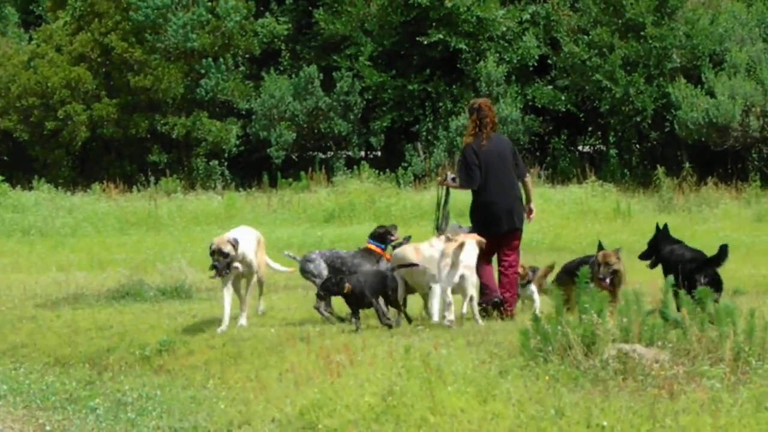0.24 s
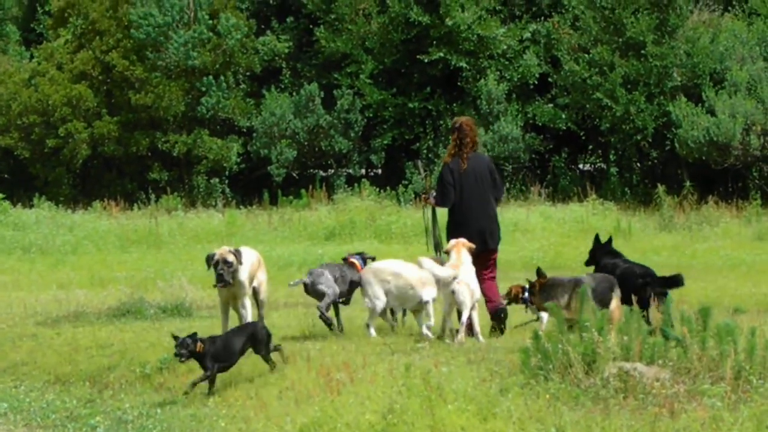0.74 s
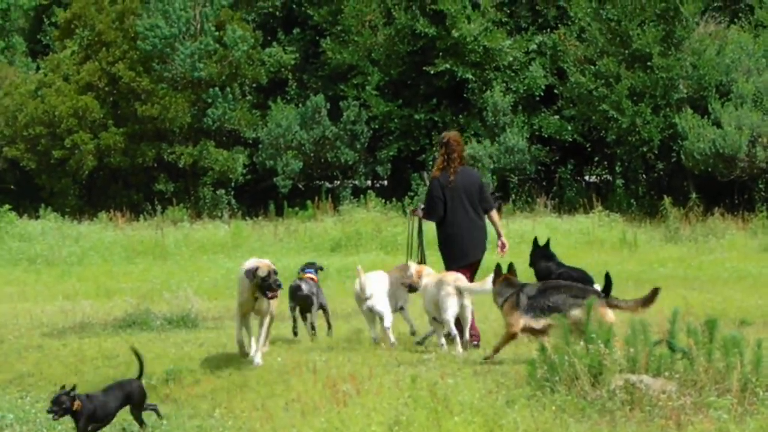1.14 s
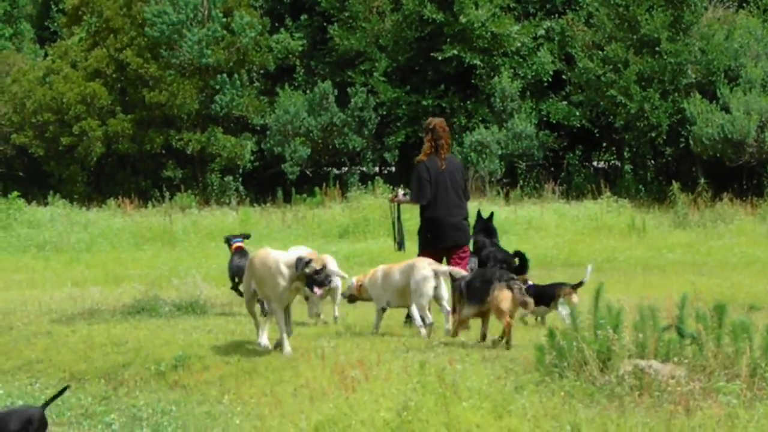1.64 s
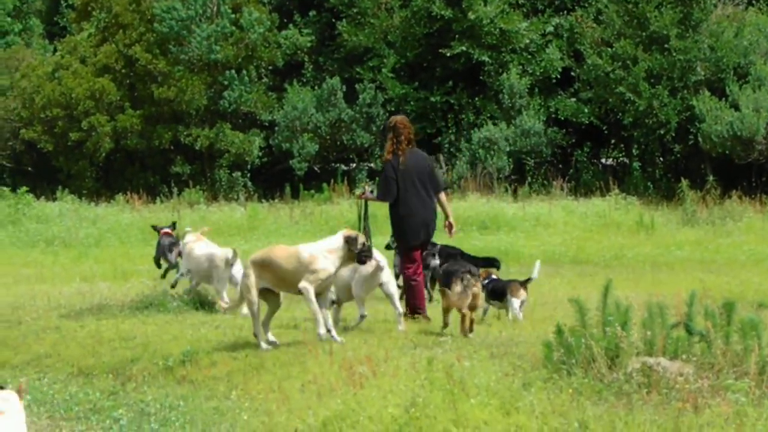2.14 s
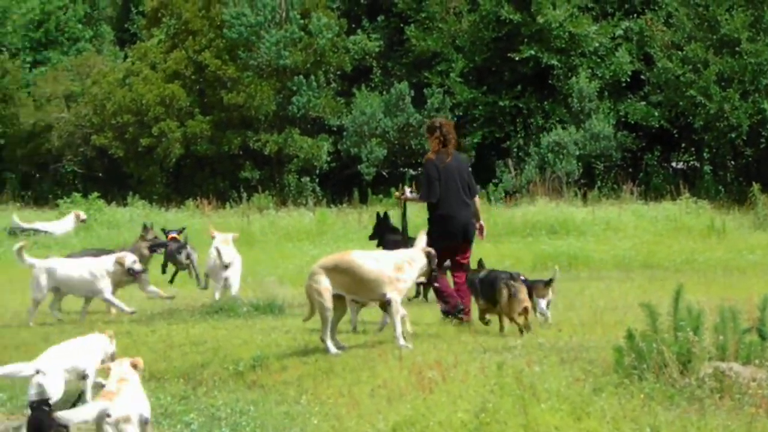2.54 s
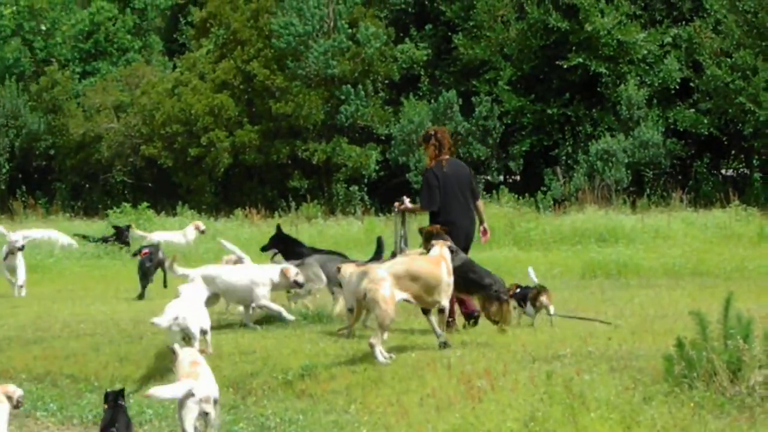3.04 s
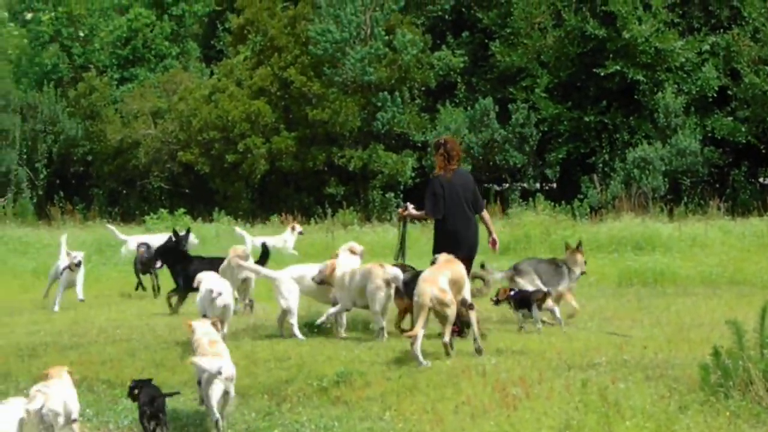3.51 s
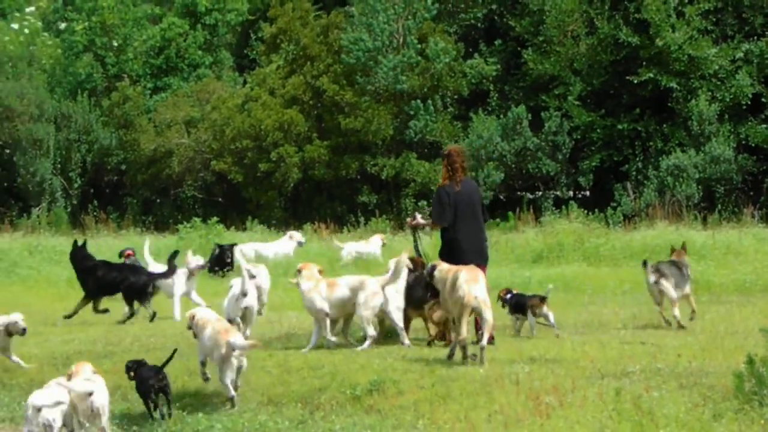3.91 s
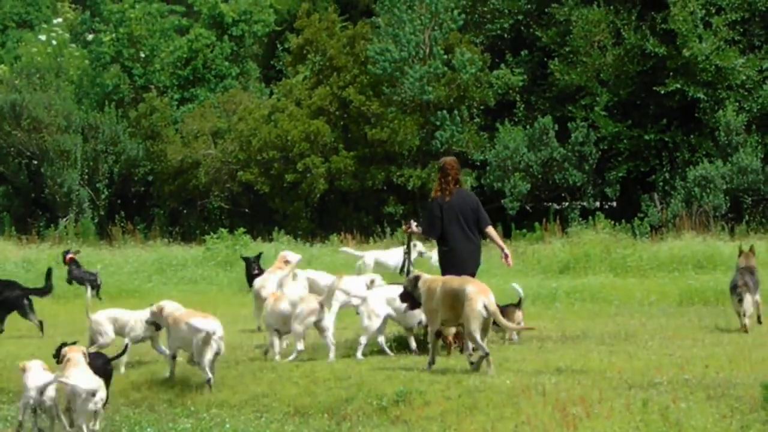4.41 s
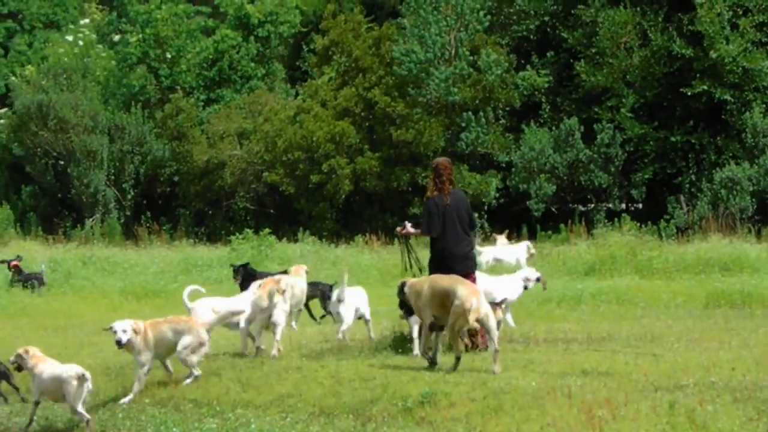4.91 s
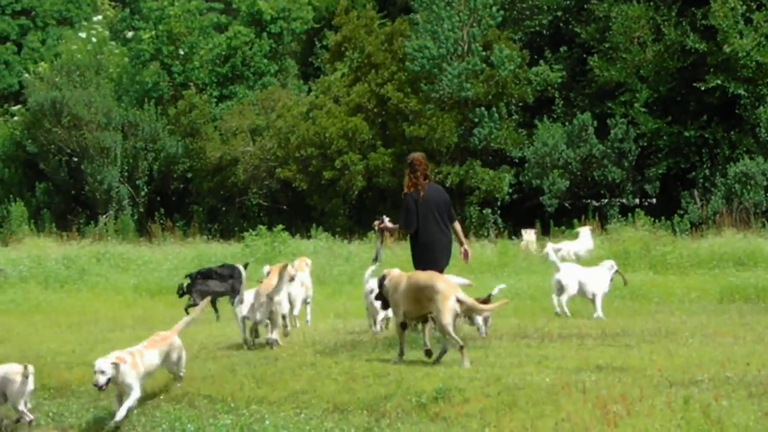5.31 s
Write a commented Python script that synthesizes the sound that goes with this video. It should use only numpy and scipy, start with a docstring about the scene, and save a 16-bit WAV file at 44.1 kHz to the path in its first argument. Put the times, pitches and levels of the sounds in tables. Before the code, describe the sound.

A close, crisp swishing of long grass with brittle snaps and muffled paw patter, fading after four seconds to near silence and tiny insect chirps.

```python
"""Open field, long grass: a pack of dogs trots past and moves off. Patchy noise under contact envelopes makes
blades, stems and turf; tiny decaying grains make the crackle. Snapping stalks, paw falls and knocked stems are
short rings plus coloured noise bursts. Late on, insects chirp and soft pants or swishes sound as narrow noise;
the field adds hiss and a faint low rumble. The mono microphone path has a narrow notch and a band limit."""
import sys
import numpy as np
from scipy import signal
from scipy.io import wavfile
from scipy.ndimage import uniform_filter1d

SR = 44100
rng = np.random.default_rng(int(sys.argv[2]) if len(sys.argv) > 2 else 0)


def store_wav(level_fs):
    """Save 16-bit WAV to argv[1]."""
    pcm = np.round(np.clip(np.atleast_2d(level_fs), -1, 1) * 32767)
    wavfile.write(sys.argv[1], SR, pcm.T.astype(np.int16))


N = 244972  # samples

# pack passing and leaving: (time [s], rustle level [dB], paw patter level [dB])
PACK_LEVELS = [(0.0, -39, -47), (0.34, -38.5, -47), (0.6, -39.5, -46), (0.93, -38, -47),
               (1.1, -40.5, -42.5), (1.22, -42.5, -44.5), (1.36, -38, -49), (1.51, -40.5, -48.5),
               (1.87, -42.5, -46.5), (2.05, -38.5, -48.5), (2.63, -40.5, -49), (2.84, -41.5, -51),
               (3.17, -39, -47), (3.63, -41.5, -52), (3.8, -43, -49), (4.03, -44.5, -55.5), (4.2, -45, -62),
               (4.44, -50.5, -63.5), (5.15, -57, -63), (5.55, -57.5, -66)]
# move to the far stem colour: (time [s], far share [0-1])
FAR_SHARE = [(2.6, 0.53), (3.8, 1)]
# legs sweeping through a tuft: (start [s], blade level [dB], stem level [dB], length [s])
TUFT_SWEEPS = [(0.171, -37.5, -51, 0.027), (0.419, -41, -44.5, 0.043), (0.5, -39.5, -54, 0.016),
               (0.746, -36, -49, .025), (0.765, -33, -42, 0.013), (0.945, -37.5, -42.5, 0.028),
               (1.074, -48, -52, 0.016), (1.3, -33.5, -47, 0.0088), (1.584, -41.5, -42.5, 0.038),
               (1.83, -40.5, -40.5, 0.042), (2.128, -38, -51, 0.011), (2.251, -35, -41, 0.0054),
               (2.312, -36.5, -51, 0.011), (2.67, -34.5, -56, 0.011), (2.855, -37, -45.5, 0.055),
               (3.15, -37, -61, 0.014), (3.25, -40.5, -48.5, 0.077), (3.375, -35.5, -41.5, 0.016),
               (3.549, -39.5, -44, 0.028), (3.668, -41, -45, 0.032), (3.71, -41.5, -45, 0.048),
               (3.932, -53, -47.5, 0.054), (4.104, -42.5, -56, 0.027), (4.308, -50.5, -55, 0.084),
               (4.678, -53, -56, .04), (4.791, -52, -58, 0.087), (5.313, -51, -58.5, 0.081)]
# dry stalks snapping: (time [s], level before blow_db [dB], pitch [Hz], crack re snap [dB])
STALK_SNAPS = [(0.0313, -25, 7110, -24), (0.167, -22, 6970, -25), (0.182, -22, 6050, -23),
               (0.253, -18, 9090, -22), (0.3326, -25, 6200, -22), (0.7015, -13.5, 5850, -26),
               (0.747, -20, 5900, -18), (0.759, -15.5, 9900, -18), (0.772, -14.5, 9050, -16),
               (0.951, -22, 8900, -24), (0.963, -26, 6700, -18), (1.114, -24, 8750, -19),
               (1.307, -18.5, 6530, -24), (1.479, -26, 5900, -24), (1.8607, -24, 6020, -24),
               (2.005, -21, 6000, -17), (2.1321, -21, 5900, -15), (2.1499, -14, 6100, -29),
               (2.1664, -23, 7200, -19), (2.2534, -13.5, 5840, -29), (2.3672, -21.5, 8870, -22),
               (2.393, -21, 4200, -27), (2.5637, -22, 9200, -21), (2.6765, -25, 8910, -18),
               (2.8074, -28, 6300, -12), (2.861, -17, 5890, -20), (2.954, -21, 5780, -19),
               (3.063, -17, 9050, -15), (3.0904, -22.5, 6700, -11), (3.155, -24, 6650, -15),
               (3.313, -32, 7260, -12), (3.347, -21, 9500, -17), (3.38, -16, 8700, -23),
               (3.497, -19, 6800, -18), (3.6693, -21, 8980, -15), (3.678, -23, 6700, -16),
               (3.777, -22.5, 4600, -33), (3.958, -28, 3640, -24), (4.061, -27, 7150, -21),
               (4.1076, -27, 9000, -19), (4.2407, -20.5, 7440, -24), (4.4627, -34, 3900, -26),
               (4.4724, -39, 3700, -26), (4.5218, -32, 3670, -30), (4.584, -36, 3600, -26),
               (4.6048, -28, 7000, -22), (4.6309, -30.5, 5240, -19), (4.66, -31, 5600, -21),
               (4.891, -30, 9300, -15), (5.034, -42, 6300, -22), (5.4014, -48, 5600, -22),
               (5.4514, -37, 5200, -20), (5.4714, -41, 4200, -22)]
# heavier paw falls: (time [s], level before blow_db [dB], pitch [Hz])
PAW_FALLS = [(0.1, -29, 608), (0.162, -34, 755), (0.19, -35, 670), (0.379, -27.5, 735), (0.436, -31, 720),
             (0.51, -30.5, 634), (0.549, -27.5, 674), (0.72, -32.5, 546), (0.759, -30, 630),
             (0.894, -38, 630), (0.963, -28.5, 845), (1.075, -33.5, 643), (1.087, -29, 825),
             (1.13, -37, 724), (1.191, -33, 567), (1.236, -32, 630), (1.264, -34, 610), (1.318, -29, 706),
             (1.362, -27.5, 760), (1.552, -27.5, 630), (1.566, -27, 698), (1.706, -33, 576),
             (1.903, -30, 810), (1.919, -28, 650), (2.106, -27.5, 596), (2.2, -35.5, 596),
             (2.322, -33, 600), (2.36, -34, 680), (2.395, -30, 766), (2.551, -31, 670), (2.863, -36.5, 566),
             (2.94, -33.5, 760), (2.988, -27, 533), (3.008, -25, 687), (3.072, -34, 794), (3.291, -39, 580),
             (3.563, -31.5, 813), (3.601, -32.5, 790), (3.836, -28, 596), (3.775, -42, 750),
             (3.909, -38.5, 790)]
# legs knocking thick stems: (time [s], level before blow_db [dB], pitch [Hz])
STEM_KNOCKS = [(0.397, -24, 2200), (0.5124, -29.5, 1290), (0.6907, -33, 1850), (0.776, -26, 1290),
               (1.02, -28.5, 1840), (1.274, -28.5, 1250), (1.3398, -29.5, 1800), (1.494, -28.5, 1250),
               (1.6004, -26.5, 1920), (1.9275, -25.5, 1910), (2.251, -21.5, 3060), (2.3195, -23, 2610),
               (2.551, -25, 1730), (2.6367, -26, 2460), (2.8613, -27, 2950), (3.047, -31, 1260),
               (3.283, -28, 3120), (3.3788, -31, 1910), (3.392, -28, 1880), (3.4506, -31, 2280),
               (4.059, -36, 1920), (4.3125, -41, 1210), (4.4006, -39, 2270), (4.604, -40, 1920),
               (4.6972, -38, 2980), (4.815, -38, 2370), (4.895, -38, 3000), (5.29, -46, 1110),
               (5.47, -44, 2070)]
# insect chirps near 9.6 kHz and soft pants or swishes near 7 kHz: (centre time [s], level [dB], pitch [Hz])
CHIRPS_AND_PANTS = [(4.498, -60, 9600), (4.70, -60, 9600), (4.862, -50, 6960), (4.92, -57, 9550),
                    (5.144, -53, 9700), (5.37, -55, 6950), (5.379, -55, 9400), (5.53, -63, 10700)]
# rumble fading: (time [s], gain [dB])
RUMBLE_FADE_DB = [(0, 1), (2.5, 0.5), (4, -2), (5.55, -3)]

# spectrum of thin blades rubbing: (frequency [Hz], relative density [dB per Hz])
BLADE_COLOUR = [(1940, -35), (2500, -22), (2740, -25), (2980, -10.5), (3500, -6.5), (4720, -3), (5140, -4),
                (6050, 0), (7260, 0.5), (7900, -1.5), (9120, -1), (15700, -21.5)]
# spectrum of stems bending: (frequency [Hz], relative density [dB per Hz])
STEM_COLOUR = [(560, -34), (960, -11.5), (1080, 2.5), (1260, 2.5), (1470, -2), (1780, 1), (2100, -3.5),
               (2440, 2), (2740, -5), (3040, 3), (3400, -13.5), (4420, -3), (7480, -120)]
# stems further off, ground echo cutting deeper: (frequency [Hz], relative density [dB per Hz])
FAR_STEM_COLOUR = [(560, -41), (960, -15.5), (1060, -8.5), (1220, -1.5), (1440, -4), (1870, -1),
                   (2040, -3.5), (2450, -4), (2730, -9), (2980, -4.5), (3400, -7.5), (4420, -16.5),
                   (7480, -120)]
# spectrum of turf under paws: (frequency [Hz], relative density [dB per Hz])
SOIL_COLOUR = [(110, -77), (190, -30.5), (303, -12), (453, -10.5), (539, -3), (637, 0), (812, 0),
               (959, -11), (1000, -18), (1300, -32), (2200, -120)]
# brittle top of a near snap: (frequency [Hz], relative density [dB per Hz])
CRACK_COLOUR = [(6000, -49), (9500, -12), (11500, 11), (15800, 10)]
# spectrum of field hiss: (frequency [Hz], relative density [dB per Hz])
AIR_COLOUR = [(120, -43), (200, -15.5), (365, -2), (744, -8), (1050, -0.5), (1310, -3), (1600, -7),
              (4060, -15.5), (6650, -11), (7830, -15), (9400, 3), (11300, -12.5), (15700, -9.5)]
# spectrum of low rumble: (frequency [Hz], relative density [dB per Hz])
RUMBLE_COLOUR = [(12, -53), (20, -13), (32, -2.5), (75, -4), (108, 3), (124, -4.5), (140, -1.5),
                 (200, -24.5), (260, -46), (440, -120)]

AIR_DB, RUMBLE_DB = -53.5, -71.5  # rumble before its fade
RUSTLE, PAWS = 1, 2  # columns of PACK_LEVELS
STEMS_NEAR_DB, STEMS_FAR_DB = -1.5, -5  # re rustle
SNAP_T60_S, CRACK_T60_S, THUD_T60_S, KNOCK_T60_S = 0.022, 0.022, 0.071, 0.028  # noise bursts; rings die sooner
SWEEP_RISE_S, SWEEP_RISE_SHARE = 0.0015, 0.099  # time constant = base + share of length
SWEEP_FADE_S, SWEEP_FADE_SHARE = 0.0053, 0.26
WEIGHT_DB, WEIGHT_LOSS_DB_PER_S, WEIGHT_PITCH_RATIO = -11, 4, 0.561  # low body of a paw fall
CHIRP_WIDTH_S = 0.053  # between 1/e points
NOTCH_HZ, NOTCH_WIDTH_HZ, NOTCH_DEPTH = 7880, 840, 0.98
EDGE_HZ = 15810


def gain_of(db):
    """Amplitude ratio of a level in dB."""
    return 10 ** (np.asarray(db) / 20)


def evened(x):
    """Scale to unit RMS."""
    return x / np.sqrt(np.mean(x ** 2) + 1e-20)


def add(mix, s, sound):
    """Add a sound in place at s seconds, cut at the end of the mix."""
    part = mix[max(round(s * SR), 0):][:len(sound)]
    part += sound[:len(part)]


def colour(x, points):
    """Minimum-phase filter to the given spectrum; white noise keeps its power."""
    f, db = np.transpose(points)
    hz = np.abs(np.fft.fftfreq(8192, 1 / SR))
    gain_db = np.interp(np.log(hz + 1), np.log(f + 1), db)
    log_gain = np.log(gain_of(np.maximum(gain_db, -90)))
    spectrum = np.exp(np.conj(signal.hilbert(log_gain)))
    taps = np.fft.ifft(spectrum).real[:4096]
    return signal.oaconvolve(x, taps / np.linalg.norm(taps))[:N]


def patchy_noise(patchy_db, frames_wide, bins_wide):
    """White noise whose level drifts in random patches of time and frequency."""
    real, imag, patches = rng.standard_normal((N // 64 + 5, 129, 3)).T
    patches = uniform_filter1d(patches, int(bins_wide), 0)
    patches = evened(uniform_filter1d(patches, int(frames_wide), 1))
    spectrum = (real + 1j * imag) * gain_of(patchy_db * patches)
    return evened(signal.istft(spectrum, nperseg=256, noverlap=192)[1][:N])


def brushes(per_s, spread_db, decay_s, rise_s):
    """Unit-RMS envelope of random contacts, each rising quickly and dying away, sizes varied."""
    chance, size = rng.random(N), np.minimum(rng.exponential(1, N), 4)
    t = np.arange(round(0.15 * SR)) / SR
    shape = np.exp(-t / decay_s) * (1 - np.exp(-t / rise_s))
    contacts = (chance < per_s / SR) * gain_of(2 * spread_db * size)  # power
    power = signal.oaconvolve(contacts, shape ** 2)[:N]
    return np.sqrt(np.abs(power) / np.mean(power))


def hits(rows, points, t60, ring, cycles, rise_s, blow_db):
    """Each blow: a ring of a few cycles at its pitch plus a longer noise burst in the struck colour."""
    t = np.arange(round(0.06 * SR)) / SR
    noise = rng.standard_normal((len(rows), len(t)))
    tone, burst = np.zeros(N), np.zeros(N)
    shape = gain_of(-60 * t / t60) * (1 - np.exp(-t / rise_s))
    for (s, db, hz), hiss in zip(rows, noise):
        blow = shape * gain_of(db + blow_db) / shape.max()
        add(tone, s, blow * np.exp(-t * hz / cycles) * np.sin(2 * np.pi * hz * t))
        add(burst, s, blow * hiss)
    return ring * tone + (1 - ring) * colour(burst, points)


def small_hits(column, above_db, spread_db, low_hz, high_hz, count):
    """Lesser blows at random moments, their strength following a level of the pack."""
    when, size, pitch = rng.random((count, 3)).T
    s = when * N / SR
    table = np.transpose(PACK_LEVELS)
    db = np.interp(s, table[0], table[column]) + above_db + spread_db * size
    return np.transpose([s, db, low_hz * (high_hz / low_hz) ** pitch])


def field():
    """Steady patchy hiss of the open field over a faint, fading low rumble."""
    air = evened(colour(patchy_noise(2.8, 30, 3.4), AIR_COLOUR))
    rumble = evened(colour(rng.standard_normal(N), RUMBLE_COLOUR))
    fade_db = np.interp(np.arange(N) / SR, *np.transpose(RUMBLE_FADE_DB))
    return gain_of(AIR_DB) * air + gain_of(RUMBLE_DB + fade_db) * rumble


def rustle(shared, bed, patchy_db, bins_wide, per_s, spread_db, decay_s, rise_s):
    """Patchy noise under a dense bed of far contacts (power share bed) plus nearer separate ones."""
    contacts = brushes(per_s, spread_db, decay_s, rise_s)
    envelope = shared * np.sqrt(bed + (1 - bed) * contacts ** 2)
    return evened(patchy_noise(patchy_db, 14, bins_wide) * envelope)


def crackle(per_s, spread_db, cycles, low_hz, high_hz, count):
    """Single blades cracking: grains of a few cycles, each pitch with its own sparse train."""
    size = gain_of(spread_db * np.minimum(rng.exponential(1, N), 4))
    size = size * (rng.random(N) < per_s / SR)
    kind, t, out = rng.integers(0, count, N), np.arange(128) / SR, np.zeros(N)
    for k, hz in enumerate(np.geomspace(low_hz, high_hz, count)):
        grain = np.exp(-t * hz / cycles) * np.sin(2 * np.pi * hz * t)
        out += signal.oaconvolve(size * (kind == k), grain)[:N]
    return evened(colour(out, BLADE_COLOUR))


def pack():
    """Blades, stems and turf stirred by the passing dogs, with tuft sweeps and crackle."""
    time_s = np.arange(N) / SR
    table_s, rustle_db, patter_db = np.transpose(PACK_LEVELS)
    level_db = np.interp(time_s, table_s, rustle_db)
    paws_db = np.interp(time_s, table_s, patter_db)
    far = np.interp(time_s, *np.transpose(FAR_SHARE))
    stems_db = level_db + STEMS_NEAR_DB + (STEMS_FAR_DB - STEMS_NEAR_DB) * far
    swept_blades, swept_stems = sweeps()

    # a step stirs blades, stems and turf together
    steps = np.sqrt(1.1 + 0.15 * brushes(per_s=50, spread_db=-0.5, decay_s=0.021, rise_s=0.0014) ** 2)
    tuft = rustle(1, bed=0.52, patchy_db=2.5, bins_wide=10,
                  per_s=290, spread_db=-4.0, decay_s=0.0017, rise_s=0.00023)
    blades = rustle(steps, bed=0.62, patchy_db=1.0, bins_wide=5.2,
                    per_s=210, spread_db=1.5, decay_s=0.0076, rise_s=0.00019)
    stems = rustle(steps, bed=1.0, patchy_db=1.5, bins_wide=3,
                   per_s=360, spread_db=1.0, decay_s=0.0083, rise_s=0.00047)
    paws = rustle(steps, bed=0.67, patchy_db=3.0, bins_wide=2,
                  per_s=63, spread_db=2.1, decay_s=0.054, rise_s=0.00072)
    cracks = crackle(per_s=700, spread_db=5.0, cycles=3.2, low_hz=1800, high_hz=13300, count=16)

    cracks = gain_of(level_db - 8.0) * cracks
    blades = colour(gain_of(level_db) * blades + np.sqrt(swept_blades) * tuft, BLADE_COLOUR)
    stems = gain_of(stems_db) * stems + np.sqrt(swept_stems) * tuft
    stems = (1 - far) * colour(stems, STEM_COLOUR) + far * colour(stems, FAR_STEM_COLOUR)
    turf = colour(gain_of(paws_db) * paws, SOIL_COLOUR)
    return blades + cracks + stems + turf


def snaps():
    """Dry stalks break: a ring and a burst, topped by a brittle crack; lesser snaps fall at random."""
    s, db, hz, crisp_db = np.transpose(STALK_SNAPS)
    small = small_hits(RUSTLE, above_db=6.0, spread_db=7.0, low_hz=3000, high_hz=9700, count=45)
    rows = np.vstack([np.transpose([s, db, hz]), small])
    cracks = np.vstack([np.transpose([s, db + crisp_db, hz]), small + [0, -23.5, 0]])
    body = hits(rows, BLADE_COLOUR, SNAP_T60_S, ring=0.62, cycles=4.9, rise_s=0.0001, blow_db=-2.0)
    top = hits(cracks, CRACK_COLOUR, CRACK_T60_S, ring=0, cycles=4.5, rise_s=0.0006, blow_db=-3.5)
    return body + top


def paw_falls():
    """Paws thud on turf and crush stems; a lower, slower body weakens as the dogs go."""
    small = small_hits(PAWS, above_db=-4.0, spread_db=9.5, low_hz=570, high_hz=850, count=28)
    falls = np.vstack([PAW_FALLS, small])
    s, db, hz = falls.T
    weight = np.transpose([s, db + WEIGHT_DB - WEIGHT_LOSS_DB_PER_S * s, WEIGHT_PITCH_RATIO * hz])
    thuds = hits(falls, SOIL_COLOUR, THUD_T60_S, ring=0.72, cycles=9.1, rise_s=0.0013, blow_db=-1.0)
    crushed = hits(falls, STEM_COLOUR, THUD_T60_S, ring=0, cycles=8.5, rise_s=0.0011, blow_db=-13.0)
    body = hits(weight, SOIL_COLOUR, THUD_T60_S, ring=0.9, cycles=9.9, rise_s=0.0084, blow_db=-2.5)
    return thuds + crushed + body


def sweeps():
    """Power of legs sweeping a tuft, for blades and stems: each rises, holds, then dies."""
    blades, stems = np.zeros(N), np.zeros(N)
    t = np.arange(round(0.25 * SR)) / SR
    for s, blades_db, stems_db, length in TUFT_SWEEPS:
        rise = SWEEP_RISE_S + SWEEP_RISE_SHARE * length
        fade = SWEEP_FADE_S + SWEEP_FADE_SHARE * length
        shape = (1 - np.exp(-t / rise)) * np.exp(-np.maximum(t - length, 0) / fade)
        add(blades, s, gain_of(2 * blades_db) * shape)
        add(stems, s, gain_of(2 * stems_db) * shape)
    return blades, stems


def knocks():
    """Legs knock thick stems: mostly ring, some stem noise; lesser knocks fall at random."""
    small = small_hits(RUSTLE, above_db=5, spread_db=5, low_hz=1150, high_hz=3100, count=60)
    rows = np.vstack([STEM_KNOCKS, small])
    return hits(rows, STEM_COLOUR, KNOCK_T60_S, ring=0.78, cycles=9.0, rise_s=0.0013, blow_db=-1.0)


def chirps_and_pants(pole_width_hz=320):
    """Fuzzy whistles: narrow noise around each pitch, swelling and fading."""
    t, out = np.arange(round(0.3 * SR)) / SR - 0.15, np.zeros(N)
    r = np.exp(-np.pi * pole_width_hz / SR)
    noise = rng.standard_normal((len(CHIRPS_AND_PANTS), 2, len(t)))
    for (s, db, hz), (real, imag) in zip(CHIRPS_AND_PANTS, noise):
        slow = signal.lfilter([1], [1, -2 * r, r ** 2], real + 1j * imag)
        fuzz = slow * np.exp(2j * np.pi * hz * t)  # shift up to pitch
        swell = np.exp(-(2 * t / CHIRP_WIDTH_S) ** 2)
        add(out, s + t[0], gain_of(db) * evened(fuzz.real) * swell)
    return out


def scene():
    """Sum all sources, the same in both channels."""
    mono = field() + pack() + snaps() + paw_falls() + knocks() + chirps_and_pants()
    return np.array([mono, mono])


def record(dry):
    """Microphone path: a narrow notch, then the band limit."""
    notched = signal.lfilter(*signal.iirnotch(NOTCH_HZ, NOTCH_HZ / NOTCH_WIDTH_HZ, SR), dry)
    notched = dry + NOTCH_DEPTH * (notched - dry)
    low_pass = signal.firwin(1535, EDGE_HZ, window=("kaiser", 9), fs=SR)
    return signal.oaconvolve(notched, low_pass[None], "same")


dry = scene()
out = record(dry)
store_wav(out)
```